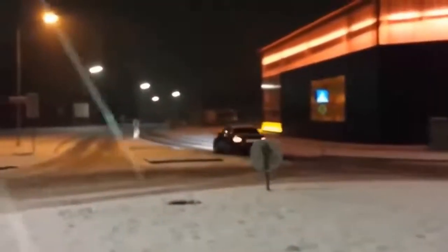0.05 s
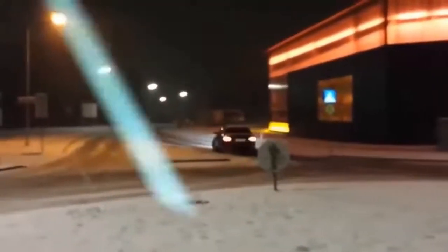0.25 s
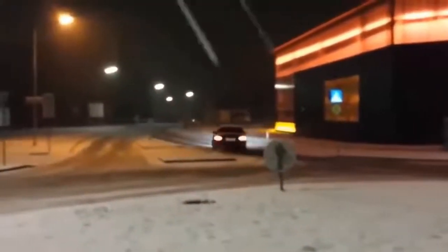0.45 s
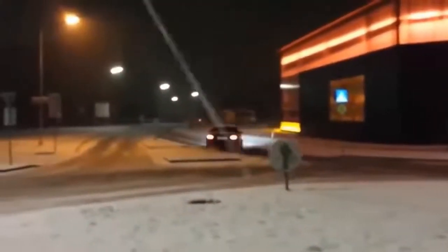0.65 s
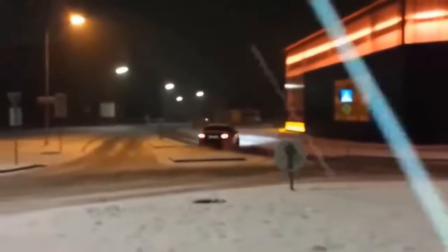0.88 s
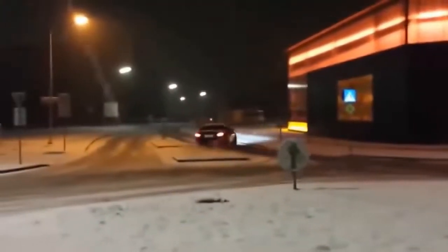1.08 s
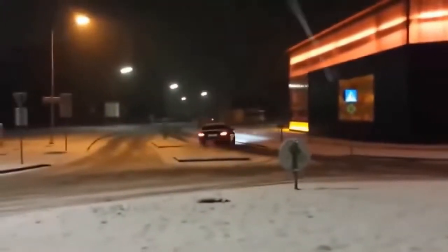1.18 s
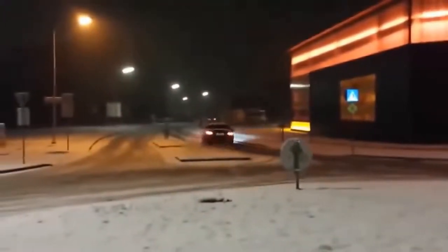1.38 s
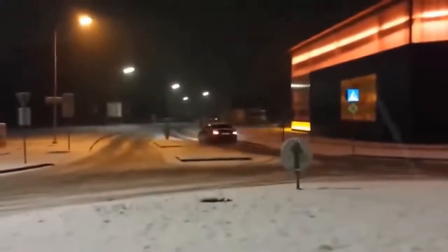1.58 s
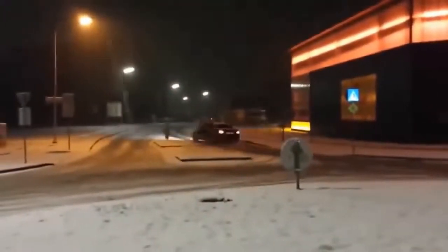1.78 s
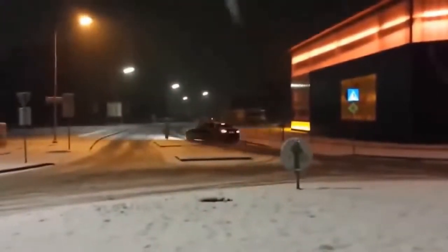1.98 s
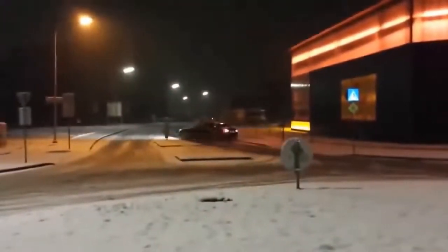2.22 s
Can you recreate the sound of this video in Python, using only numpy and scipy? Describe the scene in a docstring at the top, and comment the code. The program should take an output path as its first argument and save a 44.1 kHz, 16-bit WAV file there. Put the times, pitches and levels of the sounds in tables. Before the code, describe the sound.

A winter jacket rubs close to the microphone, a gritty swish with small crackles that builds until about 0.8 seconds. Behind it, a distant car revs on a snowy corner, its low note climbing over road rumble. At about 1.25 seconds comes one dull, hollow, stumbling knock, followed by a second crackling swish. The engine peaks at 1.5 seconds, then sinks and fades with the rubbing by 2.2 seconds.

```python
"""A distant car revs through a slide on a snowy corner at night, a low engine note climbing over road rumble.
Close by, a long gritty swish, like a winter jacket rubbing, builds from tiny slips; creases crackle in it.
At about 1.25 s comes one dull stumbling knock, like a heavy step or a bump: hollow clacks on low thuds.
A second crackling swish follows. The engine tops out at 1.5 s, then sinks and fades with the rubbing."""
import sys
import numpy as np
from scipy import signal
from scipy.fft import rfft, irfft, next_fast_len
from scipy.io import wavfile
from scipy.ndimage import uniform_filter1d, map_coordinates

SR = 44100
rng = np.random.default_rng(int(sys.argv[2]) if len(sys.argv) > 2 else 0)


def master(y):
    """Save y as 16-bit WAV."""
    cut = np.clip(np.atleast_2d(y).T, -1, 1)
    pcm = np.round(cut * 32767)  # scale
    wavfile.write(sys.argv[1], SR, pcm.astype(np.int16))


N = 99225

# the rev of the exhaust note: time_s, pitch_hz, level_db
ENGINE_REV = [(0, 92.45, -63), (.28, 100.8, -50.5), (.62, 118.8, -47.5), (.8, 137.5, -49),
              (1.03, 146.3, -45.5), (1.2, 165.1, -56), (1.36, 185.9, -47.5), (1.43, 196, -38.5),
              (1.5, 237.6, -54), (1.6, 230.3, -43), (1.75, 202.6, -51), (1.9, 171.9, -55.5),
              (2.25, 138.4, -67)]
# swell of the road rumble: time_s, level_db (before its trim)
RUMBLE_LEVEL = [(0, -41), (.15, -46), (.4, -48.5), (.55, -43), (.85, -49), (1.03, -39.5), (1.2, -38),
                (1.42, -39.5), (1.52, -45.5), (1.82, -45), (1.92, -50.5), (2.25, -49)]
# tone of the road rumble: frequency_hz, gain_db
RUMBLE_EQ = [(20, -25), (35, -30), (55, -4), (80, -1.5), (125, -1.5), (170, -3.5), (220, -7), (300, -14),
             (450, -60), (900, -86)]

# the jacket's strokes in five bands, low to high: time_s, level_db (before each band's trim)
BODY_LEVEL = [(0, -42.5), (.08, -49), (.2, -48), (.3, -49), (.42, -45.5), (.56, -42), (.8, -45.5),
              (.94, -43), (1.1, -40), (1.2, -35.5), (1.33, -38.5), (1.375, -42), (1.42, -42.5), (1.58, -41),
              (1.67, -45.5), (1.8, -39.5), (1.87, -46), (2.02, -46), (2.17, -50.5), (2.25, -56)]
SCRAPE_LEVEL = [(0, -36.5), (.14, -43.5), (.25, -36.5), (.6, -38), (.71, -33), (.84, -34), (.92, -39),
                (1.1, -42.5), (1.31, -39.5), (1.372, -47), (1.395, -35.5), (1.45, -30.5), (1.51, -32),
                (1.58, -35), (1.66, -37), (1.72, -30), (1.79, -35.5), (1.88, -28.5), (1.92, -35),
                (2.11, -39.5), (2.25, -51)]
SWISH_LEVEL = [(0, -40.5), (.05, -43), (.16, -39.5), (.24, -36), (.4, -36), (.6, -37), (.74, -32.5),
               (.82, -37.5), (1.02, -44), (1.12, -38.5), (1.22, -41.5), (1.28, -33), (1.375, -44.5),
               (1.392, -35), (1.47, -33.5), (1.6, -37.5), (1.85, -38.5), (1.92, -42.5), (1.98, -38.5),
               (2.18, -48.5), (2.25, -54)]
HISS_LEVEL = [(0.0, -46), (0.09, -48.5), (0.32, -36.5), (0.34, -41.5), (0.57, -36), (0.59, -40),
              (0.79, -34.5), (0.86, -44), (1.33, -40.5), (1.38, -47), (1.39, -38), (1.52, -36), (1.67, -45),
              (1.95, -44), (2.22, -57), (2.25, -62)]
FIZZ_LEVEL = [(0.0, -50.5), (0.53, -38.5), (0.73, -43.5), (0.75, -42), (0.95, -47), (1.12, -42),
              (1.28, -44), (1.32, -38.5), (1.37, -47.5), (1.4, -38), (1.79, -48.5), (1.84, -43),
              (1.85, -49), (1.97, -49), (2.2, -56), (2.25, -61)]
# tone of each of those bands: frequency_hz, gain_db
BODY_EQ = [(150, -47), (310, -9), (430, -1), (560, 4), (750, 0.5), (950, -3.5), (1500, -41.5)]
SCRAPE_EQ = [(450, -14), (750, -8.5), (1100, 0), (1400, -2), (1700, -2), (2100, -3.5), (2500, -15.5),
             (4000, -52)]
SWISH_EQ = [(1300, -42), (2200, -2.5), (2500, -0.5), (3000, 2), (3600, 0), (4800, 0), (5500, -2.5),
            (6300, -37), (9000, -47)]
HISS_EQ = [(3800, -45), (5300, -10.5), (6000, 0.5), (6500, 1.5), (7200, -2.5), (7800, -4.5), (9000, -23),
           (12000, -60)]
FIZZ_EQ = [(5500, -29), (7000, -9), (7700, -1), (8300, 0), (9400, -3), (10500, -10.5), (11300, -16),
           (12200, -38)]
# notches that nearby reflections cut into the rubbing: centre_hz, depth_db
REFLECTION_NOTCHES = [(720, 3), (2290, 10.5), (2750, 11), (3280, 9), (3850, 2.5), (5230, 7.5), (5730, 10),
                      (6260, 30.5), (6820, 14), (7450, 5.5), (7980, 13)]
# creases snapping: start_s, level_db, pitch_hz, rise_cycles
CREASE_SNAPS = [(.215, -25.5, 1660, 1.6), (.705, -21, 1130, 0.54), (0.835, -22, 1700, 0.88),
                (.862, -40, 1300, 0.98), (.948, -22.5, 1060, 0.58), (1.007, -22, 1000, 0.86),
                (1.074, -17, 736, 0.46), (1.077, -23, 500, 1.36), (1.389, -27, 1016, 3.7),
                (1.389, -27, 2064, 3), (1.402, -26, 1078, 2.8), (1.451, -29, 1010, 1.1),
                (1.496, -27.5, 1710, 6.3), (1.501, -24, 1980, 2), (1.626, -28, 1410, 2.3),
                (1.7208, -16, 1110, 0.92), (1.771, -23.5, 1290, 0.62), (1.799, -26, 1210, 1.06),
                (1.853, -30, 1128, 0.53), (1.882, -23.5, 1230, 1.3), (2.113, -32, 1314, 0.83)]

# contacts of the knock: start_s, clack_db, clack_pitch_hz, thud_db
KNOCK_CONTACTS = [(1.239, -18, 460, -24), (1.2578, -8.5, 545, -18.5), (1.269, -23, 454, -10.5),
                  (1.277, -20, 725, -31), (1.292, -23, 470, -17), (1.331, -29, 564, -27)]
# low ring of the thud: pitch_hz, level_db, t60_s
THUD_MODES = [(60, -11, .12), (112, -8.5, 0.17), (133.6, 0, .11), (180, -2, 0.099), (262, -16.5, .12)]
# hollow ring of the clack: pitch_hz, level_db, t60_s
CLACK_MODES = [(363.5, -23, 0.16), (442, -17.5, 0.16), (488, -27, .13), (620, -25, 0.15), (840, -27, .1)]

PATCH_HZ, PATCH_S, NOTCH_HALF_WIDTH_HZ = 350, .07, 58.4
KNOCK_LOW_CUT_HZ, MIX_HIGH_CUT_HZ = 48, 12290


def amp(db):
    """Decibels to gain."""
    return 10 ** (np.asarray(db) / 20)


def unit(x):
    """Scaled to rms 1."""
    return x / np.sqrt(np.mean(x ** 2) + 1e-20)


def curves(rows):
    """One automation curve for each column after the time."""
    times, *columns = np.transpose(rows)
    return [np.interp(np.arange(N) / SR, times, column) for column in columns]


def wobble(rate_hz):
    """A smooth random curve through rate_hz points a second."""
    points = rng.standard_normal(int(N * rate_hz / SR) + 4)
    return map_coordinates(points, [np.arange(N) * rate_hz / SR])


def filtered(x, response):
    """x through a gain that depends on frequency."""
    size = next_fast_len(N + SR // 2)
    return irfft(rfft(x, size) * response(np.fft.rfftfreq(size, 1 / SR)), size)[:N]


def equalised(x, eq):
    """x through an EQ curve drawn on a log frequency axis."""
    points_hz, db = np.transpose(eq)
    return filtered(x, lambda hz: amp(np.interp(np.log(hz + 1), np.log(points_hz), db)))


def add(track, start_s, sound):
    """Mixes a sound into the track at start_s."""
    part = track[int(start_s * SR):][:len(sound)]
    part += sound[:len(part)]


def car():
    """The far exhaust note, a wavering, nearly pure tone, over the rumble of tyres and road."""
    pitch_hz, level_db = curves(ENGINE_REV)
    waver = 1 + 0.017 * wobble(rate_hz=24.5)
    phase = 2 * np.pi * np.cumsum(pitch_hz * waver) / SR
    note = unit(np.sin(phase) + amp(-14) * np.sin(2 * phase)) * amp(level_db)
    rumble = unit(equalised(rng.standard_normal(N), RUMBLE_EQ))
    return note + rumble * amp(curves(RUMBLE_LEVEL)[0] + 0.5)  # 0.5 dB trim


def patches(x, depth_db):
    """The tone drifts at random, in small patches of time and frequency."""
    frame, hop = 512, 256
    spectrum = signal.stft(x, nperseg=frame)[2]
    drift = rng.standard_normal(spectrum.shape)
    drift = uniform_filter1d(drift, round(PATCH_HZ * frame / SR), axis=0, mode="wrap")
    drift = uniform_filter1d(drift, round(PATCH_S * SR / hop), axis=1, mode="wrap")
    return signal.istft(spectrum * amp(depth_db * unit(drift)), nperseg=frame)[1][:N]


def reflections(hz):
    """Gain of the steady notches that nearby reflections cut."""
    cut_db = sum(depth_db * np.exp(-((hz - centre_hz) / NOTCH_HALF_WIDTH_HZ) ** 2)
                 for centre_hz, depth_db in REFLECTION_NOTCHES)
    return amp(-cut_db)


def rubbing(level, eq, trim_db, slips_per_s, slip_db, flutter_db, patch_db):
    """One band of friction: tiny random slips over smooth noise, under an uneven stroke."""
    smooth = rng.standard_normal(N)
    slips = unit(rng.standard_normal(N) * (rng.random(N) < slips_per_s / SR))
    friction = patches(smooth + amp(slip_db) * slips, patch_db)
    grit = unit(filtered(equalised(friction, eq), reflections))
    stroke_db = curves(level)[0] + trim_db + flutter_db * wobble(rate_hz=59.64)
    return grit * amp(stroke_db)


def jacket():
    """Cloth rubbing in two swishes: sparse slips make the lows grainy, dense ones smooth the treble."""
    body = rubbing(BODY_LEVEL, BODY_EQ, trim_db=0,
                   slips_per_s=200, slip_db=-4.5, flutter_db=0, patch_db=2)
    scrape = rubbing(SCRAPE_LEVEL, SCRAPE_EQ, trim_db=-1.12,
                     slips_per_s=300, slip_db=-5, flutter_db=1.1, patch_db=1.6)
    swish = rubbing(SWISH_LEVEL, SWISH_EQ, trim_db=0.06,
                    slips_per_s=900, slip_db=-7.5, flutter_db=.5, patch_db=2.13)
    hiss = rubbing(HISS_LEVEL, HISS_EQ, trim_db=0.6,
                   slips_per_s=1300, slip_db=-12.5, flutter_db=1.23, patch_db=1.14)
    fizz = rubbing(FIZZ_LEVEL, FIZZ_EQ, trim_db=0.2,
                   slips_per_s=1200, slip_db=-5, flutter_db=0.95, patch_db=1.0)
    return body + scrape + swish + hiss + fizz


def pop(pitch_hz, rise_cycles):
    """A heavily damped ring that swells for rise_cycles, then dies."""
    t = np.arange(SR // 10) / SR
    rise = t * pitch_hz / rise_cycles
    return rise * np.exp(1 - rise) * np.sin(2 * np.pi * pitch_hz * t)


def crumble(pitch_hz, level_db, t60_s):
    """A short gritty tail of noise around a pitch."""
    t = np.arange(SR // 10) / SR
    band = signal.butter(2, [pitch_hz * 0.56, pitch_hz * 1.31], "band", fs=SR, output="sos")
    grit = unit(signal.sosfilt(band, rng.standard_normal(len(t))))
    return grit * amp(level_db - 60 * t / t60_s)


def crackles():
    """Each crease snaps once and crumbles away."""
    out = np.zeros(N)
    for start_s, level_db, pitch_hz, rise_cycles in CREASE_SNAPS:
        snap = pop(pitch_hz, rise_cycles) + crumble(pitch_hz, level_db=-13, t60_s=0.055)
        add(out, start_s, amp(level_db) * snap)
    return out


def ring(modes, attack_s):
    """Struck modes fading out, their balance a little different at every contact."""
    t = np.arange(SR // 3) / SR
    tones = sum(amp(level_db + rng.standard_normal() - 60 * t / t60_s) * np.sin(2 * np.pi * pitch_hz * t)
                for pitch_hz, level_db, t60_s in modes)
    return tones * (1 - np.exp(-t / attack_s))


def knock():
    """A quick cluster of contacts, each a hollow, crunchy clack on a low thud."""
    out = np.zeros(N)
    for start_s, clack_db, pitch_hz, thud_db in KNOCK_CONTACTS:
        add(out, start_s, amp(thud_db) * ring(THUD_MODES, attack_s=0.0039))
        add(out, start_s, amp(clack_db) * ring(CLACK_MODES, attack_s=.004))
        crunch = pop(pitch_hz, rise_cycles=0.92) + crumble(pitch_hz, level_db=-15, t60_s=0.062)
        add(out, start_s, amp(clack_db) * crunch)
    low_cut = signal.butter(3, KNOCK_LOW_CUT_HZ, "high", fs=SR, output="sos")
    return signal.sosfilt(low_cut, out)


def scene():
    """The far car and the close sounds, mixed to mono in the open air."""
    return (car() + jacket() + crackles() + knock())[None]


def record(dry):
    """A brick-wall high cut takes the very top off the mix."""
    return filtered(dry[0], lambda hz: hz < MIX_HIGH_CUT_HZ)[None]


dry = scene()
out = record(dry)
master(out)
```